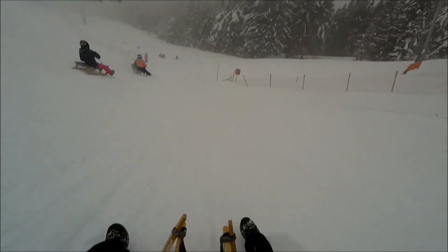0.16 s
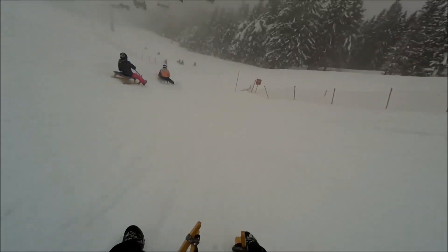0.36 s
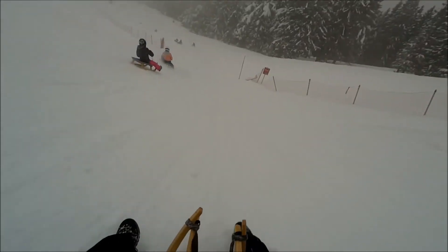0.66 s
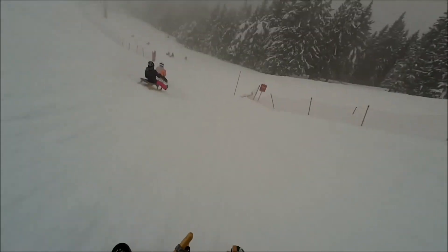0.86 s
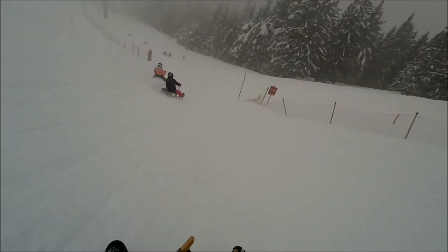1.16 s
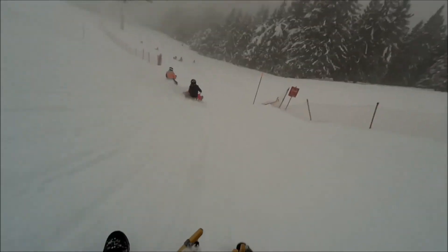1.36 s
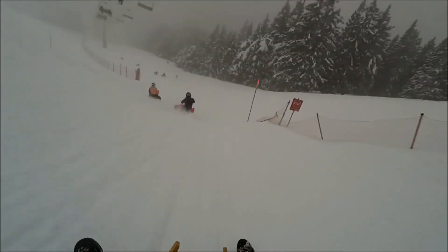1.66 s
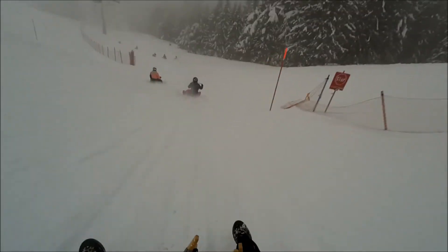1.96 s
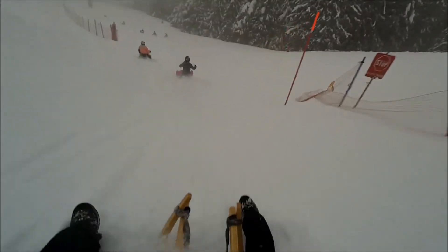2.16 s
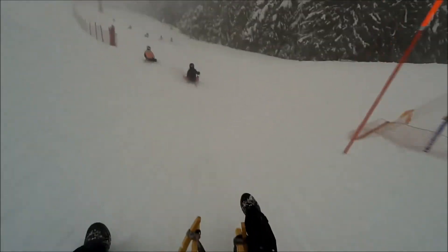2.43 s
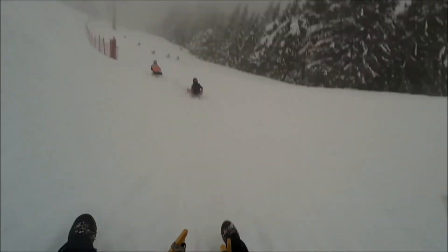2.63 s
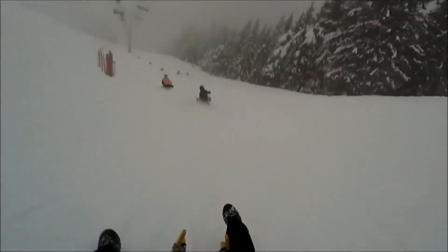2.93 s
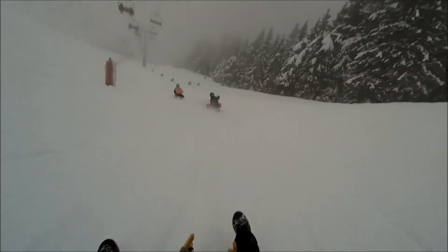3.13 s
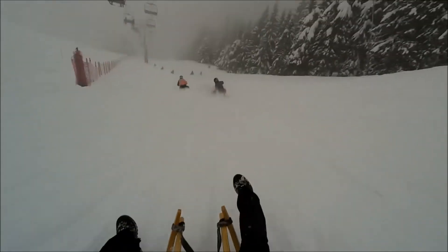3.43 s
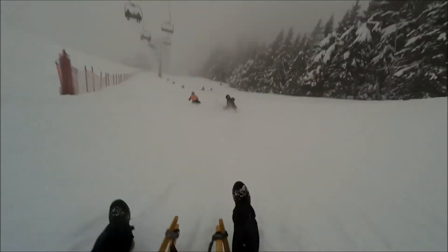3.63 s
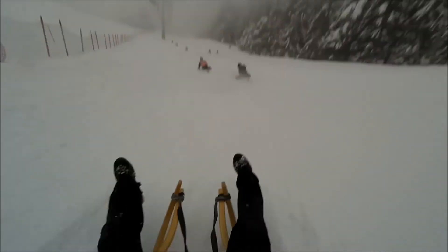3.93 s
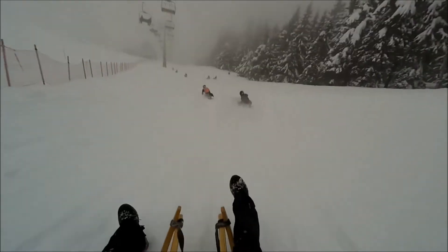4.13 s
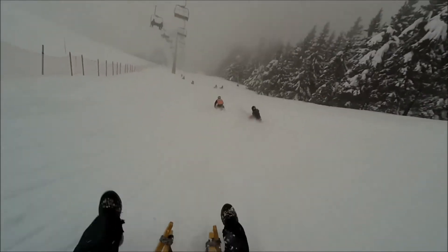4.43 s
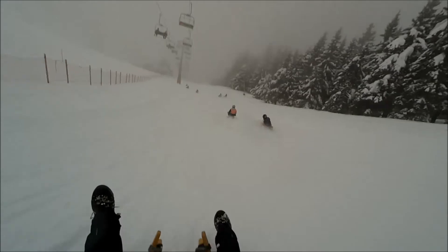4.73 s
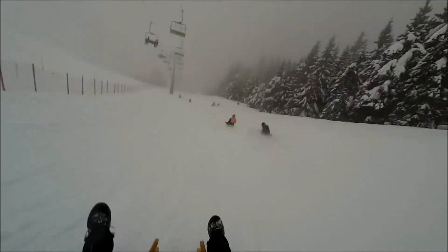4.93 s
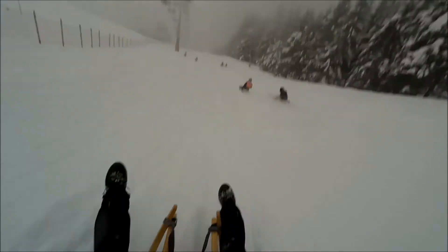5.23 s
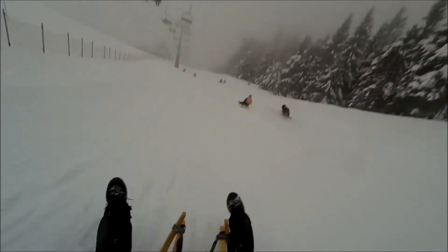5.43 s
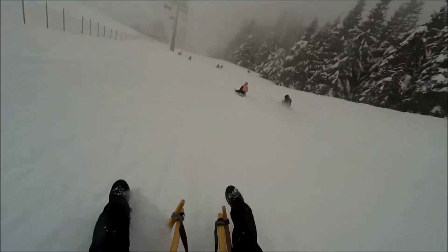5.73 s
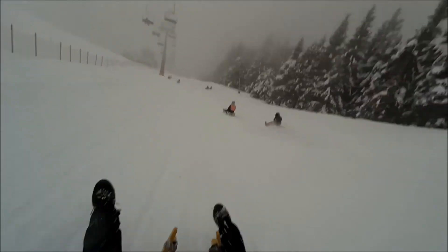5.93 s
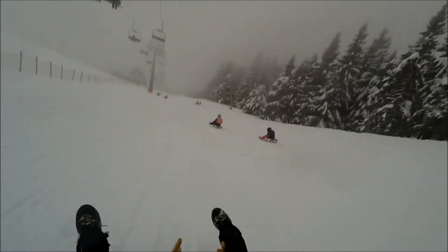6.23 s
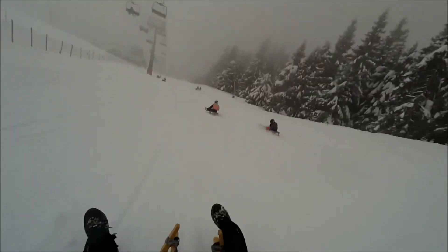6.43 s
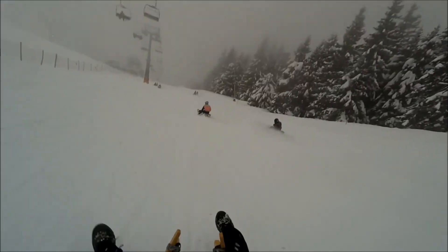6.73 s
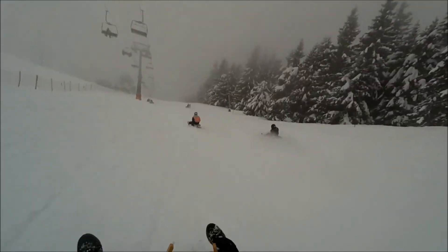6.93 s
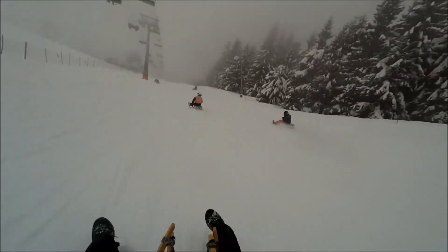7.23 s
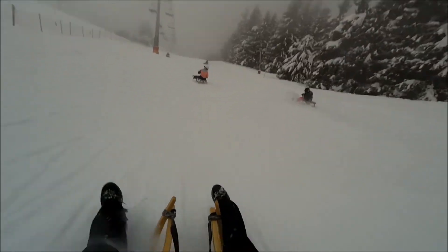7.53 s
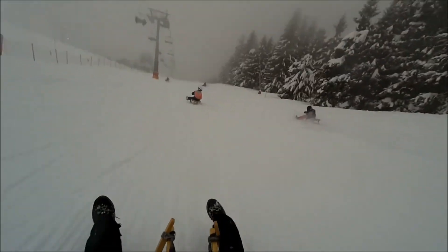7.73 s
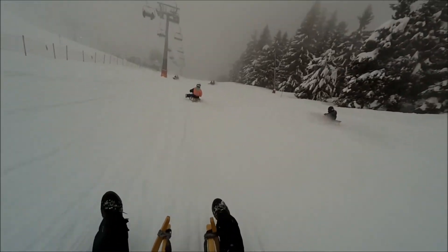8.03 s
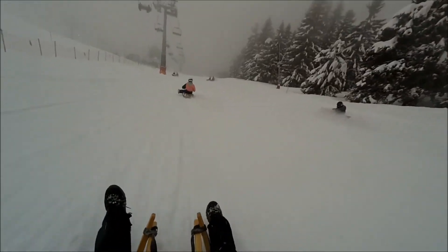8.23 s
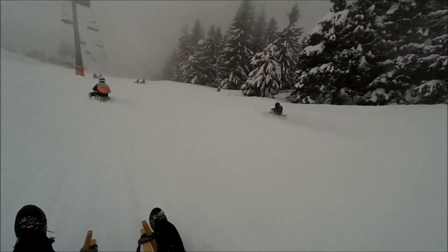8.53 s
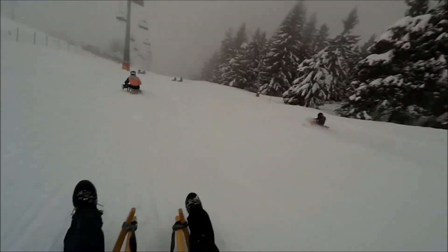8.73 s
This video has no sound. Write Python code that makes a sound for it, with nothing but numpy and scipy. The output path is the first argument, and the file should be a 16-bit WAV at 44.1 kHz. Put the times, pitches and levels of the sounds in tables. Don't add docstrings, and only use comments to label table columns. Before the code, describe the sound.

From the first moment to the end near 8.9 s, steel sled runners hiss over packed snow: a continuous, grainy, crunchy scrape with a hollow plastic ring around 1 kHz, heard close inside a small case on the rider. Very deep bass wobbles and lumpy rumble follow the ride. Around 0.85-1.15 s come strong low jolts and woody knocks; a sharp pellet tick lands near 1.45 s. Bright spurts of snow spray around 2.8 s. At 3.4 s a hard, dry, clacking blow is the loudest knock, then a cluster of ticks near 3.8 s and rattling knocks at 4.0-4.1 s. Soft woody thumps come at 5.3 s. A faint, very high squeak flickers at 6.1 s as the hiss strengthens. Crisp ticks stand out near 6.9 and 8.2 s; the later ride is calmer, without hard knocks, and the hiss runs on to the end.

```python
import sys
import numpy as np
from scipy import signal
from scipy.fft import rfft, irfft, next_fast_len
from scipy.io import wavfile
from scipy.ndimage import uniform_filter1d, map_coordinates

SR = 44100
rng = np.random.default_rng(int(sys.argv[2]) if len(sys.argv) > 2 else 0)


def to_wav(sig):
    pcm = np.clip(np.atleast_2d(sig), -1, 1) * 32767
    pcm = np.round(pcm).astype(np.int16)
    wavfile.write(sys.argv[1], SR, pcm.T)


def natural_amplitude(level_db):
    exponent = np.asarray(level_db, float) / 20
    return 10 ** exponent


N = 391166

# time_s, heave_db, half_length_s, seat_drumming_db
JOLTS = [(0.0, -20, 0.23, -57), (0.5, -24, 0.45, -67), (.86, -13, 0.1, -47.5), (1.054, -6, 0.074, -43.5),
         (1.136, -8, 0.037, -32.5), (1.386, -12, 0.18, -46), (1.764, -20.5, 0.076, -48),
         (2.026, -15.5, 0.073, -44.5), (2.277, -18.5, 0.07, -58), (2.73, -15, 0.12, -65),
         (2.95, -14, 0.15, -46.5), (3.262, -19.5, 0.09, -46), (3.46, -9, 0.088, -45),
         (3.782, -11, 0.087, -48.5), (4.08, -5.5, 0.11, -43.5), (4.398, -16, 0.15, -52),
         (4.585, -40, 0.046, -43), (4.999, -9.5, 0.078, -48), (5.224, -9.5, 0.1, -48),
         (5.417, -9.5, 0.19, -44.5), (5.777, -21, 0.23, -44.5), (6.017, -16, 0.092, -43.5),
         (6.205, -11.5, .08, -45), (6.595, -21.5, 0.9, -48.5), (7.24, -16.5, 0.11, -60),
         (7.508, -41, .12, -48), (7.74, -17.5, .1, -46), (7.944, -15, 0.065, -46), (8.25, -53, 0.36, -51),
         (8.513, -17, 0.1, -62)]
# start_s, peak_db, pitch_hz
BUMPS = [(0.0, -35.5, 161), (0.841, -29.5, 40.8), (0.856, -33.5, 89), (1.024, -35.5, 40),
         (1.125, -20.5, 45), (2.024, -35, 40), (2.939, -41, 41), (3.412, -28, 70), (3.4263, -18.5, 68),
         (3.4259, -31, 209), (3.71, -27.5, 41), (3.717, -51, 174), (3.811, -32, 40), (4.001, -38, 40),
         (4.091, -30, 45), (4.114, -32, 50), (4.948, -31, 40), (5.255, -26, 39.8), (5.33, -35, 70),
         (5.426, -24, 48), (5.487, -28.5, 49.4), (6.152, -36, 41), (6.373, -31, 40)]
# frequency_hz, level_db
HEAVE_SPECTRUM = [(1.5, -70), (4, 0), (10, -8.5), (15, -3.5), (21, -11), (30, -19.5), (50, -120)]
# frequency_hz, level_db
RUMBLE_SPECTRUM = [(12, -37), (20, -2), (30, -11), (45, -12.5), (65, -19), (130, -29), (165, -31),
                   (215, -30), (270, -43), (450, -47.5), (700, -120)]
# frequency_hz, level_db
SEAT_SPECTRUM = [(40, -40), (65, -9), (80, -4), (100, 0.5), (115, -4), (140, -17.5), (200, -67)]
# frequency_hz, level_db
HIGH_FLOOR_SPECTRUM = [(3000, -120), (5000, 12.5), (7200, -1), (8000, -23), (10200, 1), (11000, -27), (15200, -17),
                       (15500, -120)]
# frequency_hz, level_db
MIST_SPECTRUM = [(800, -120), (1500, -11.5), (3500, -1), (6000, 1), (8000, -5.5), (11000, -9.5),
                 (15000, -12), (15900, -120)]
# time_s, peak_db, half_length_s
GUSHES = [(0.905, -68, .06), (1.023, -74, .04), (1.19, -59, 0.031), (1.3, -63.5, 0.12),
          (1.714, -63.5, 0.11), (2.055, -65, 0.043), (2.124, -59, 0.043), (2.362, -73, 0.058),
          (2.755, -51, 0.033), (2.815, -59, 0.048), (2.907, -54.5, 0.026), (2.532, -76, .06),
          (3.04, -74, .06), (3.202, -80, .05), (3.503, -82, 0.032), (3.678, -59.5, 0.054),
          (3.764, -58.5, 0.024), (3.874, -73, .03), (4.018, -61.5, 0.019), (4.198, -73, 0.055),
          (4.78, -63.5, .09), (5.052, -63, 0.035), (5.21, -68, .04), (5.36, -69, 0.037),
          (5.793, -56, 0.059), (6.24, -66.5, 0.21), (6.67, -67, 0.078), (7.12, -64.5, 0.092),
          (7.45, -74.5, 0.17), (8.394, -75, .1)]
# start_s, end_s, pitch_hz, level_db
SQUEAK = (6.105, 6.19, 9950, -67)
# start_s, peak_db, ring_hz, snap_db
PELLETS = [(0.0845, -47, 9000, 1), (0.9755, -36, 7100, -18), (1.449, -32.5, 7200, 4),
           (1.8965, -42, 8000, -16), (2.305, -41, 7100, -10), (3.195, -47, 10000, -9),
           (3.3145, -48, 6950, -10), (3.772, -41, 7000, -6), (3.7835, -40, 7500, -8),
           (3.7905, -51, 7000, -8), (3.8005, -44, 8000, -8), (3.8725, -40, 8800, -12),
           (3.8815, -47, 7500, -6), (4.887, -40, 7460, -12), (5.557, -47, 10000, 9), (5.763, -37, 9100, -2),
           (6.4295, -41, 10900, 8), (6.67, -35, 9800, 3), (6.818, -61, 11000, -20), (6.881, -37, 4700, -14),
           (6.9445, -27.5, 5940, -4), (7.9265, -38, 7160, 8), (8.071, -38, 8540, -4),
           (8.1917, -30.5, 7150, 1)]
# start_s, peak_db, wood_db, t60_s, centre_hz
KNOCKS = [(0.855, -35, 5, 0.05, 1500), (1.118, -29, 3.5, 0.05, 1900), (3.415, -20, -4, 0.021, 1300),
          (3.4192, -7, -22.5, 0.013, 1510), (3.4225, -15, -18, 0.0062, 1800),
          (3.427, -18.5, -9, 0.024, 1400), (3.466, -45, -16, 0.068, 1970), (3.718, -34, -4, 0.054, 1800),
          (3.9953, -23.5, -10, 0.019, 1500), (4.003, -28.5, -19, 0.053, 1400),
          (4.019, -17, -7, 0.019, 2090), (4.068, -30, -6, 0.039, 1200), (4.082, -29, 1, 0.023, 2100),
          (4.093, -28, 5, 0.019, 1300), (5.273, -28, -2.5, 0.03, 700), (5.346, -33.5, 4, 0.034, 553)]
# centre_hz, width_hz, level_db
MOUNT_MODES = [(860, 280, -6.5), (1300, 67, 2.5), (1605, 110, -10.5), (2100, 190, 2), (2620, 1500, -8),
               (3420, 180, -1.5), (4660, 500, -7)]
# centre_hz, width_hz, level_db
CASE_MODES = [(564, 138, -20), (1000.8, 35, 1), (1327, 98, -11), (1567, 15, -12.5), (2000, 317, -18.5),
              (2695, 206, -14.5), (3425, 230, -8), (3829, 159, -8), (4466, 263, -20.5), (5830, 590, -27),
              (7100, 160, -29.5)]
# frequency_hz, level_db
SNOW_SPECTRUM = [(150, -120), (250, -21), (700, -30), (1200, -23.5), (2500, -20), (4000, -41),
                 (6500, -47.5), (9000, -39.5), (15500, -76), (17000, -120)]
# time_s, hiss_db
PRESSURE = [(0, -40.5), (.55, -42), (1.0, -39), (1.31, -39), (1.5, -40.5), (2.15, -39), (2.5, -42.5),
            (2.85, -44), (3.1, -41), (3.7, -41.5), (4.4, -43), (4.9, -39.5), (5.3, -38), (5.9, -39.5),
            (6.27, -36.5), (6.62, -39.5), (7.1, -37), (8.87, -40)]
# time_s, depth_db, half_length_s
LIFTS = [(0.045, 4, 0.048), (0.31, 3.5, 0.035), (.64, 2, 0.024), (0.79, 3, 0.067), (1.08, 5, 0.037),
         (1.93, 3, 0.065), (2.383, 4.5, 0.1), (2.646, 3, 0.041), (2.96, 2, .03), (3.185, 2.5, 0.031),
         (3.558, 6, 0.039), (3.819, 5.5, 0.04), (4.047, 5, 0.034), (4.67, 2, 0.034), (4.94, 5, 0.035),
         (6.19, 2, .03), (7.68, 3, 0.11), (8.07, 2, 0.24), (5.62, 0, 0.072), (8.61, 4, 0.14)]


def unit(x):
    return x / np.sqrt(np.mean(x ** 2) + 1e-20)


def along(points, hz):
    f, value = np.transpose(points)
    return np.interp(np.log(hz + 0.1), np.log(f + 0.1), value)


def wobble(rate_hz):
    return map_coordinates(rng.standard_normal(1000), [np.arange(N) * rate_hz / SR])


def filtered(x, response):
    m = next_fast_len(N + SR // 2)
    return irfft(rfft(x, m) * response(np.fft.rfftfreq(m, 1 / SR)), m)[:N]


def noise(spectrum):
    return unit(filtered(rng.standard_normal(N), lambda hz: natural_amplitude(along(spectrum, hz))))


def resonance(hz, centre_hz, width_hz):
    damping = 1j * hz * width_hz
    return damping / (centre_hz ** 2 - hz ** 2 + damping)


def resonances(modes, hz):
    total = 0
    for k, (centre_hz, width_hz, level_db) in enumerate(modes):
        total = total + (-1) ** k * natural_amplitude(level_db) * resonance(hz, centre_hz, width_hz)
    return total


def case(hz):
    return resonances(CASE_MODES, hz)


def crunch(patchy_db, grains_hz, spread_db, grain_db):
    z = signal.stft(rng.standard_normal(N), nperseg=512)[2]
    field = uniform_filter1d(rng.standard_normal(z.shape), size=6, axis=0)
    field = uniform_filter1d(field, size=10, axis=1)
    rush = signal.istft(z * natural_amplitude(patchy_db * unit(field)), nperseg=512)[1][:N]
    breaks = rng.random(N) < grains_hz / SR
    size_db = spread_db * np.minimum(rng.exponential(size=N), 2)
    crystals = breaks * rng.standard_normal(N) * natural_amplitude(size_db)
    return unit(rush) + natural_amplitude(grain_db) * unit(crystals)


def swells(time_s, peak_db, half_s, hold):
    coarse = np.arange(0, N, 64)
    away = np.abs(coarse / SR - time_s[:, None]) / half_s[:, None]
    power = natural_amplitude(2 * (peak_db[:, None] - 10 * away ** hold)).sum(axis=0)
    return np.interp(np.arange(N), coarse, power)


def over(calm_db, power):
    return 10 * np.log10(natural_amplitude(2 * calm_db) + power)


def shaking():
    calm_heave_db, calm_seat_db, calm_rumble_db = -25.5, -54, -50
    hold = 1.47
    time_s, heave, half_s, seat = np.transpose(JOLTS)
    heave_db = over(calm_heave_db, swells(time_s, heave, half_s, hold))
    seat_db = over(calm_seat_db, swells(time_s, seat, half_s, hold))
    rumble_db = calm_rumble_db + 0.17 * (heave_db - calm_heave_db) + 0.32 * (seat_db - calm_seat_db)
    return heave_db, rumble_db, seat_db


def bumps():
    out, t = np.zeros(N + SR), np.arange(SR // 4) / SR
    onset = 1 - np.exp(-t / 0.0022)
    for start_s, peak_db, pitch_hz in BUMPS:
        turns = pitch_hz * (t + 0.0042 * (1 - np.exp(-t / 0.0044)))
        decay = natural_amplitude(peak_db - 60 * t * np.sqrt(pitch_hz) / 1.1)
        out[round(start_s * SR):][:len(t)] -= decay * onset * np.sin(2 * np.pi * turns)
    return natural_amplitude(7.5) * out[:N]


def ride():
    heave_db, rumble_db, seat_db = shaking()
    bob_hz = 6.0 * natural_amplitude(1.573 * wobble(6.6))
    bob = np.sqrt(2) * np.sin(2 * np.pi * np.cumsum(bob_hz) / SR)
    swing = natural_amplitude(heave_db - 1.4) * (bob + 0.6 * noise(HEAVE_SPECTRUM)) + bumps()
    heave = 0.5 * np.tanh(swing / 0.5)
    lumps = unit(natural_amplitude(0.49 * wobble(11) + 2.4 * wobble(25)))
    rumble = natural_amplitude(rumble_db + 8.0) * noise(RUMBLE_SPECTRUM)
    drumming = natural_amplitude(seat_db + 4.0) * noise(SEAT_SPECTRUM)
    return heave + lumps * (rumble + drumming)


def weight_on_runners():
    time_s, hiss_db = np.transpose(PRESSURE)
    return np.interp(np.arange(N) / SR, time_s, hiss_db)


def thrown():
    weight_db = weight_on_runners()
    drizzle_db = -71.5 + 0.43 * (weight_db - weight_db.mean()) + 0.51 * wobble(12)
    return over(drizzle_db, swells(*np.transpose(GUSHES), hold=2.5)) + 1.2 * wobble(35)


def spray():
    grains = natural_amplitude(1.5 * wobble(70)) * crunch(1.7, 1500, 5, -2.5)
    shell = filtered(grains, lambda hz: natural_amplitude(along(MIST_SPECTRUM, hz)) * (1 + 3 * abs(case(hz))))
    return natural_amplitude(thrown() + 10.5) * unit(shell) + natural_amplitude(-65.0) * noise(HIGH_FLOOR_SPECTRUM)


def squeak():
    start_s, end_s, pitch_hz, level_db = SQUEAK
    out, t = np.zeros(N), np.arange(round((end_s - start_s) * SR)) / SR
    knots = rng.standard_normal((2, 1000))
    level_waver, phase_waver = [np.interp(t * 150, np.arange(1000), k) for k in knots]
    fade = np.clip(np.minimum(t, t[::-1]) / 0.006, 0, 1)
    tone = np.sin(2 * np.pi * pitch_hz * t + phase_waver)
    out[round(start_s * SR):][:len(t)] = natural_amplitude(level_db + 2 * level_waver) * fade * tone
    return out


def pellets():
    out, t = np.zeros(N + SR), np.arange(512) / SR
    hz = np.fft.rfftfreq(len(t), 1 / SR)
    bands = [resonance(hz, 5600, 7000) ** 2, resonance(hz, 13200, 4500) ** 2]
    for start_s, peak_db, ring_hz, snap_db in PELLETS:
        dust = rng.standard_normal((2, len(t))) * natural_amplitude(-60 * t / 0.0055)
        ring = 0.5 * np.sin(2 * np.pi * ring_hz * t) * natural_amplitude(-60 * t / 0.0035)
        spit, snap = irfft(rfft(dust) * bands)
        burst = 0.07 * (unit(spit) + natural_amplitude(snap_db - 10.5) * unit(snap))
        out[round(start_s * SR):][:len(t)] += natural_amplitude(peak_db + 7.5) * (ring + burst)
    return out[:N]


def knocks():
    out, t = np.zeros(N + SR), np.arange(4096) / SR
    hz = np.fft.rfftfreq(len(t), 1 / SR)
    onset = 1 - np.exp(-t / 0.00024)
    mount = natural_amplitude(14.5) * resonances(MOUNT_MODES, hz)
    for start_s, peak_db, wood_db, t60_s, centre_hz in KNOCKS:
        burst = rng.standard_normal((3, len(t))) * natural_amplitude(peak_db - 60 * t / t60_s) * onset
        body = rfft(burst[0]) * resonance(hz, centre_hz, 0.95 * centre_hz) ** 2 * mount
        wood = rfft(burst[1]) * resonance(hz, 488, 380) ** 2 * natural_amplitude(wood_db + 12.5)
        crack_db = -14 - 0.94 * wood_db
        crack = rfft(burst[2] * natural_amplitude(-60 * t / 0.01)) * resonance(hz, 2800, 2960) ** 2 * natural_amplitude(crack_db)
        out[round(start_s * SR):][:len(t)] += irfft(body + wood + crack)
    return out[:N]


def contact():
    t, weight_db = np.arange(N) / SR, weight_on_runners()
    lift_db = sum(depth_db * np.exp(-((t - time_s) / half_s) ** 2) for time_s, depth_db, half_s in LIFTS)
    bright_db = -1.77 + 0.81 * (weight_db - weight_db.mean()) - 1.1 * lift_db + 0.28 * wobble(9)
    second_db = 0.53 + 2.0 * wobble(7.2)
    return weight_db - lift_db + 1.036, bright_db, second_db


def runners():
    hiss_db, bright_db, second_db = contact()
    flutter_db = 0.3 * wobble(13) + 0.84 * wobble(40)
    scrape = natural_amplitude(flutter_db) * crunch(1.1, 1500, 6.7, -7.5)
    heard = unit(filtered(scrape, lambda hz: np.hypot(abs(case(hz)), natural_amplitude(along(SNOW_SPECTRUM, hz)))))
    upper = filtered(heard, lambda hz: 1 / (1 + (2900 / (hz + 1)) ** 8))
    second = filtered(heard, lambda hz: 1 / (1 + ((hz - 1320) / 140) ** 4))
    return natural_amplitude(hiss_db) * (heard + (natural_amplitude(bright_db) - 1) * upper + (natural_amplitude(second_db) - 1) * second)


def scene():
    steady = filtered(ride() + spray() + squeak() + runners(), lambda hz: hz < 15300)
    return np.tile(steady + pellets() + knocks(), (2, 1))


def top_cut(x):
    return signal.sosfilt(signal.butter(12, 15790, fs=SR, output="sos"), x)


def record(dry):
    swing = uniform_filter1d(np.abs(dry[0]), size=2048)
    calm = uniform_filter1d((swing < 0.15) * (1 + 2.0 * wobble(43)), size=700)
    offset = natural_amplitude(-60.5) * calm * np.array([[1], [-1]])
    return top_cut(dry + offset)


dry = scene()
out = record(dry)
to_wav(out)
```